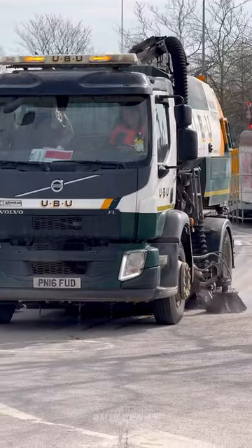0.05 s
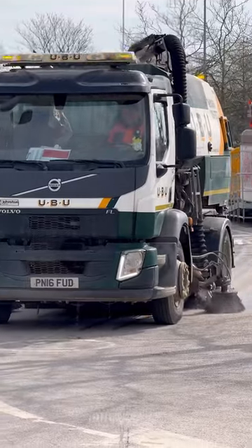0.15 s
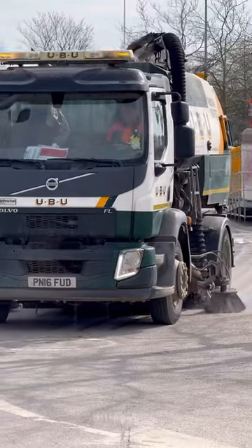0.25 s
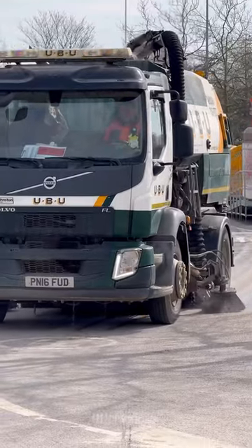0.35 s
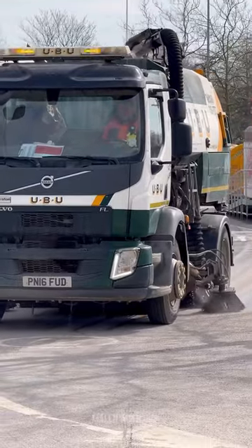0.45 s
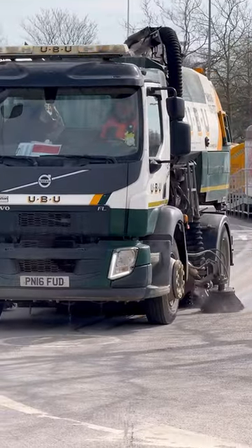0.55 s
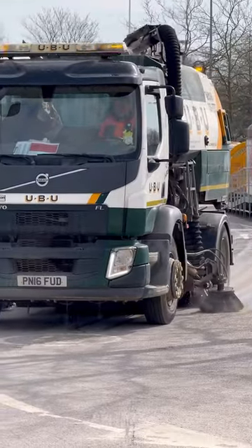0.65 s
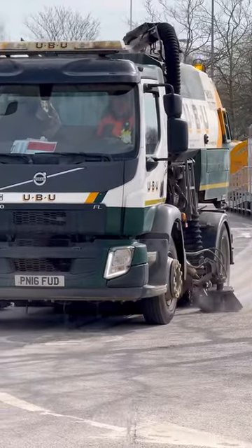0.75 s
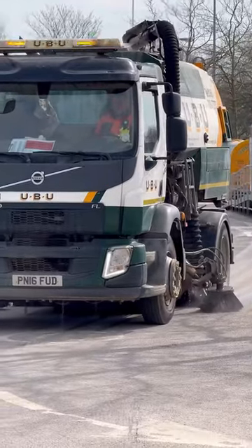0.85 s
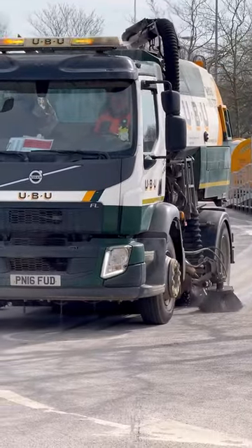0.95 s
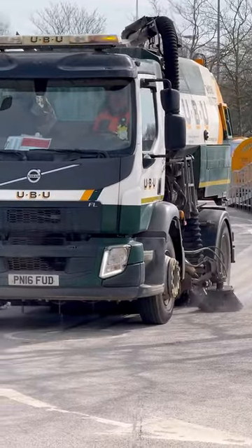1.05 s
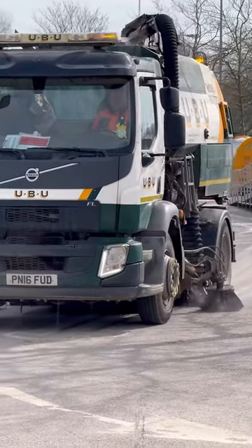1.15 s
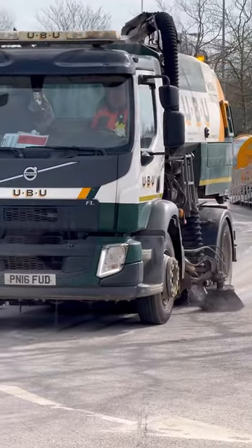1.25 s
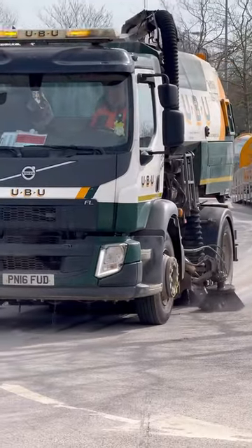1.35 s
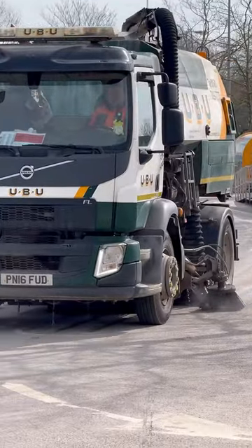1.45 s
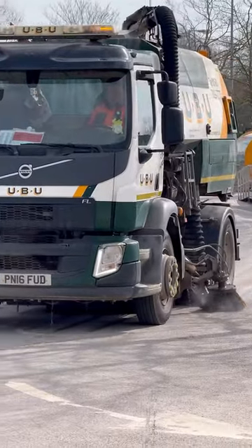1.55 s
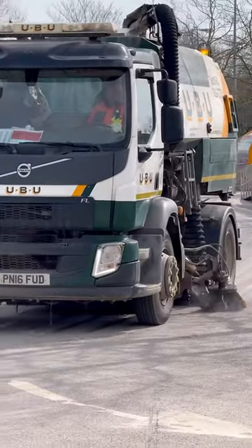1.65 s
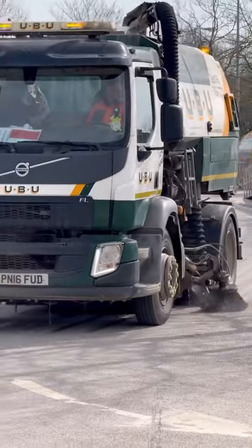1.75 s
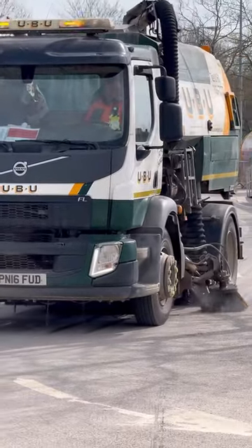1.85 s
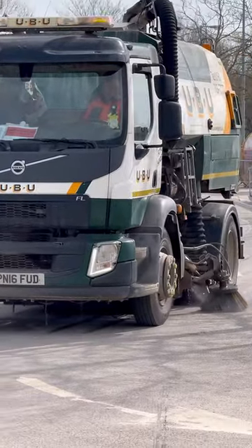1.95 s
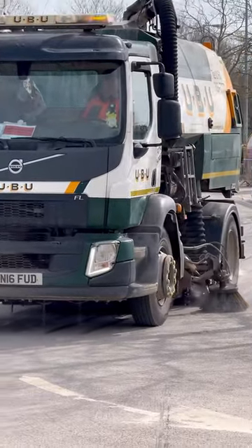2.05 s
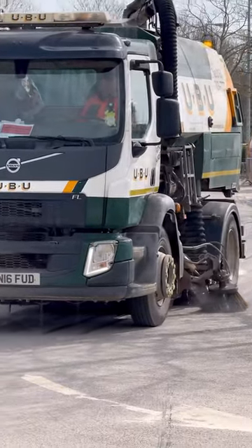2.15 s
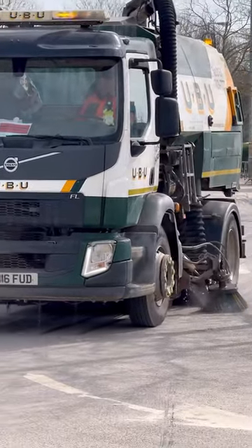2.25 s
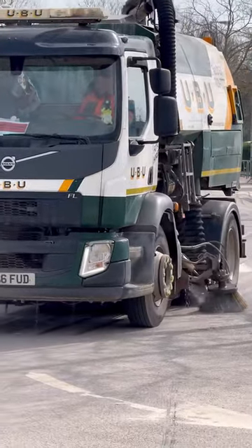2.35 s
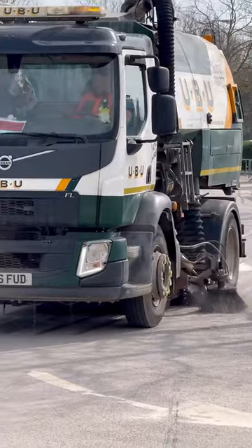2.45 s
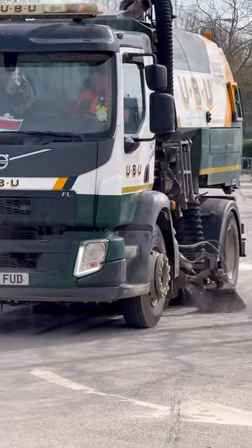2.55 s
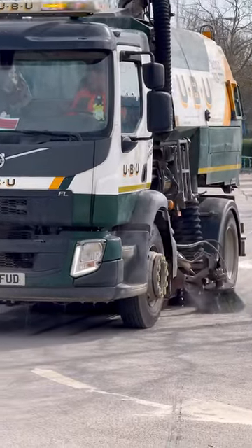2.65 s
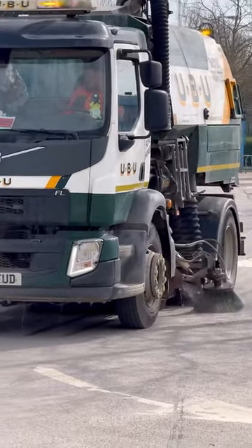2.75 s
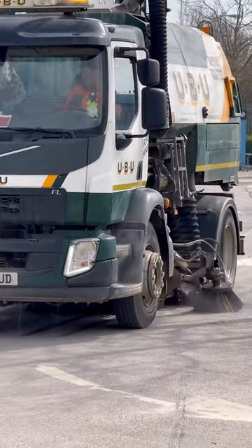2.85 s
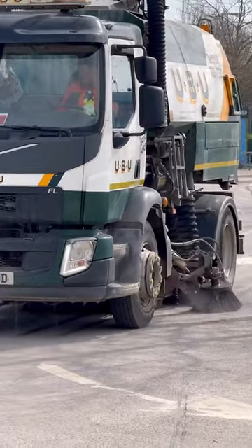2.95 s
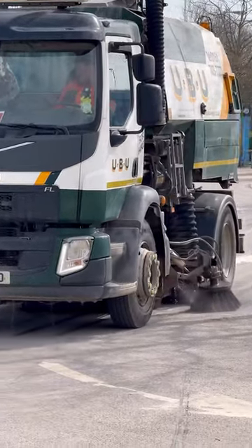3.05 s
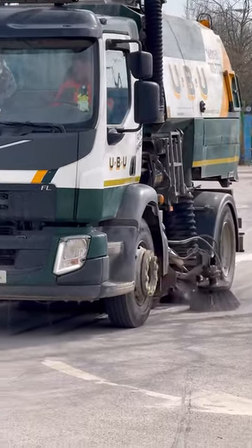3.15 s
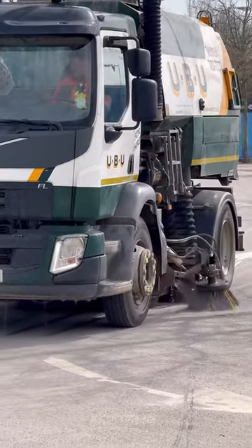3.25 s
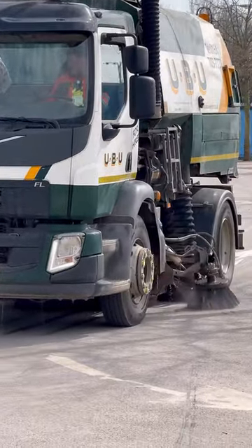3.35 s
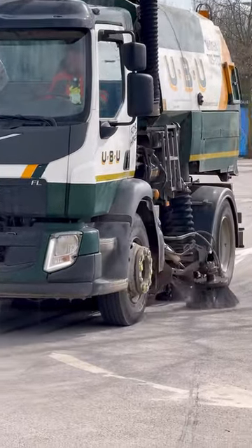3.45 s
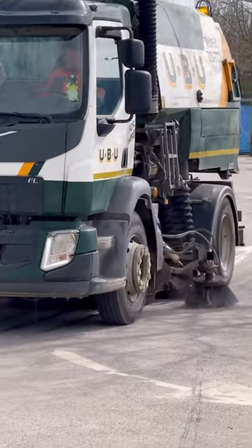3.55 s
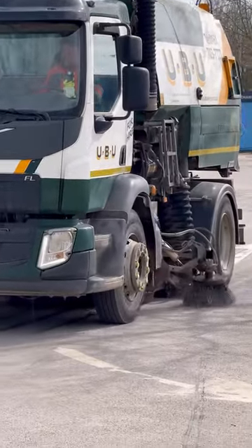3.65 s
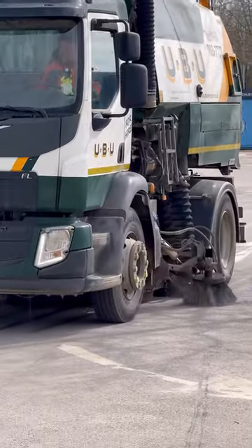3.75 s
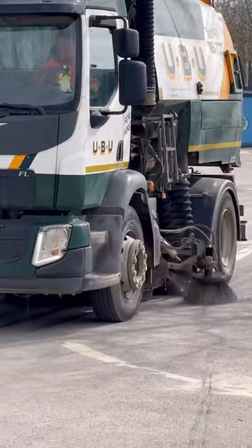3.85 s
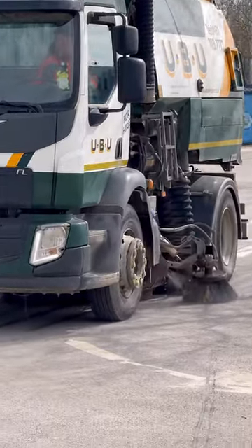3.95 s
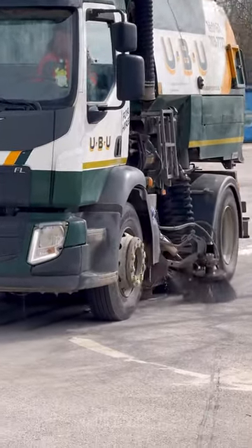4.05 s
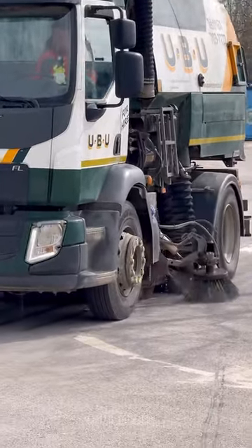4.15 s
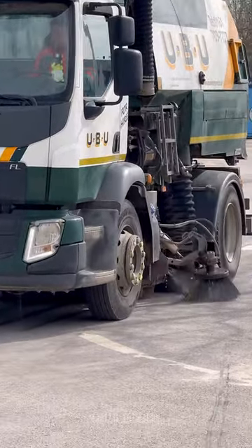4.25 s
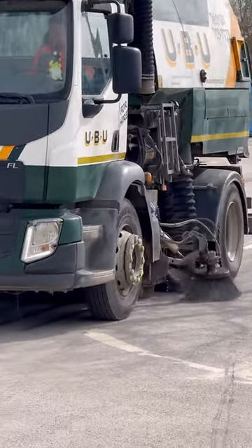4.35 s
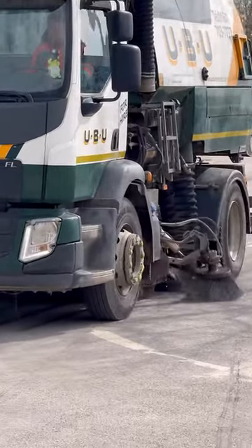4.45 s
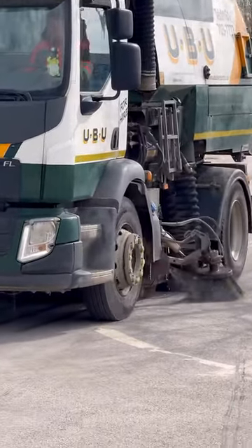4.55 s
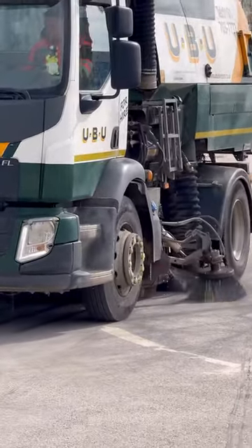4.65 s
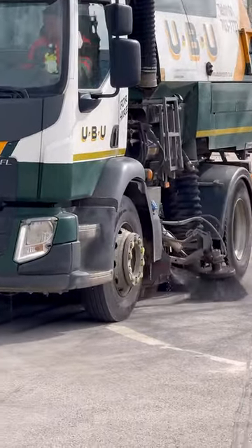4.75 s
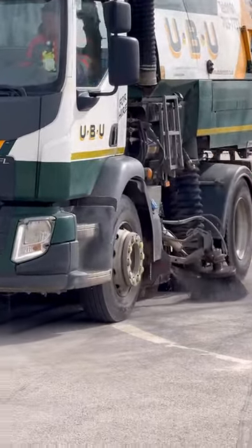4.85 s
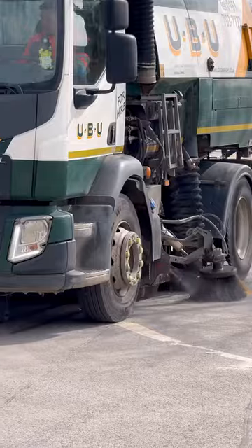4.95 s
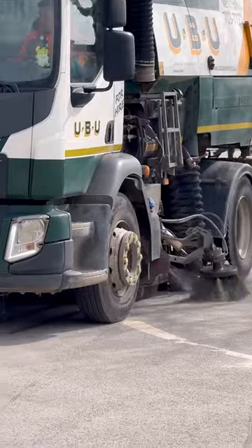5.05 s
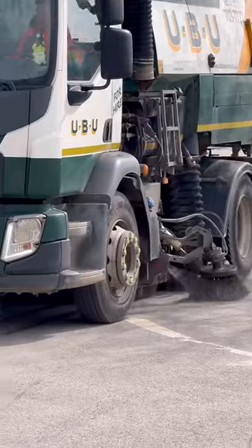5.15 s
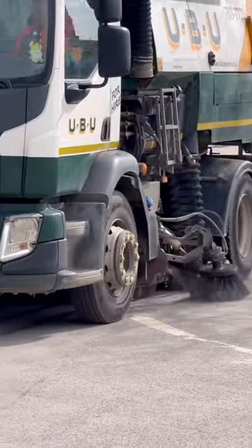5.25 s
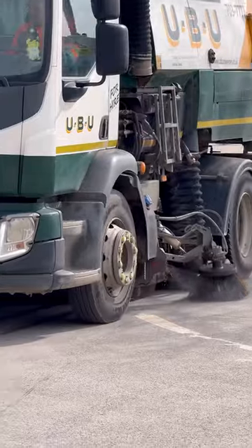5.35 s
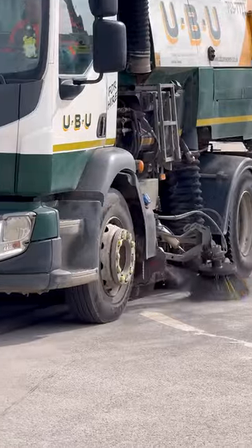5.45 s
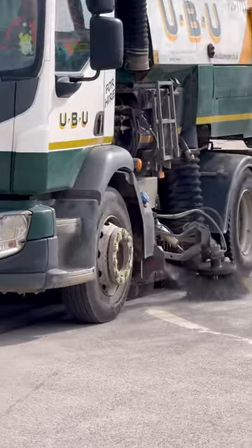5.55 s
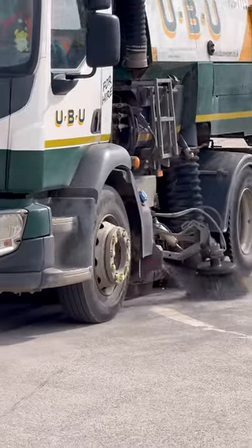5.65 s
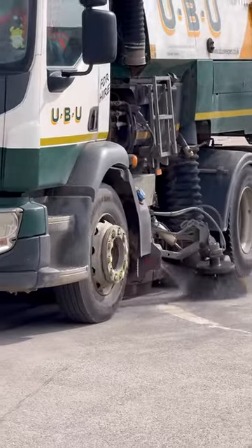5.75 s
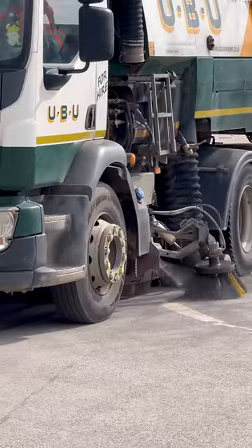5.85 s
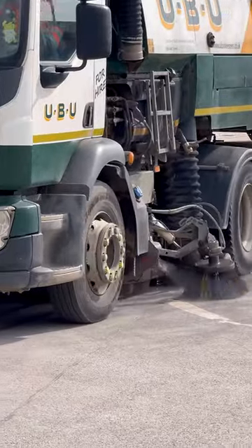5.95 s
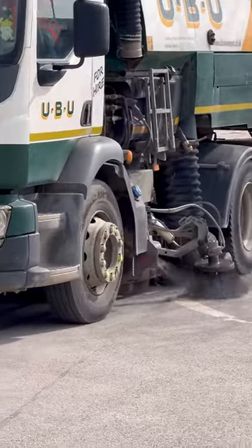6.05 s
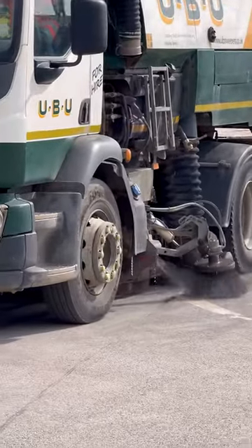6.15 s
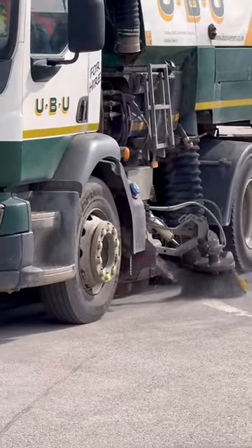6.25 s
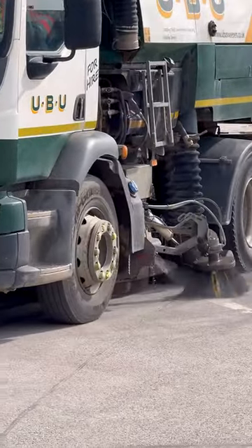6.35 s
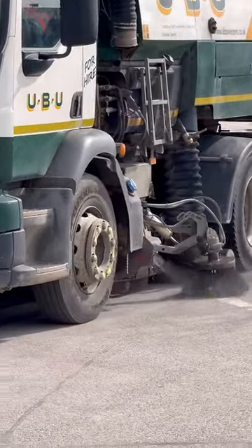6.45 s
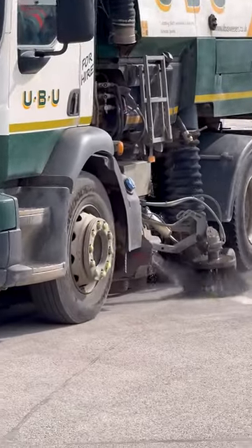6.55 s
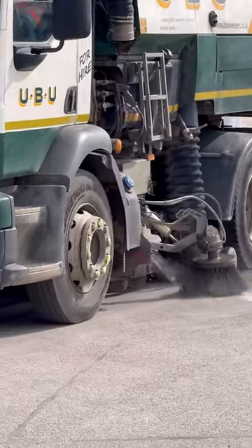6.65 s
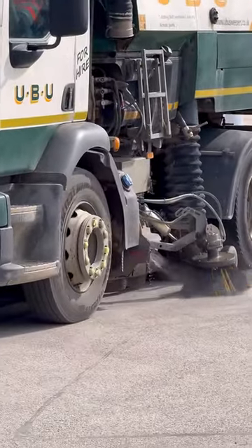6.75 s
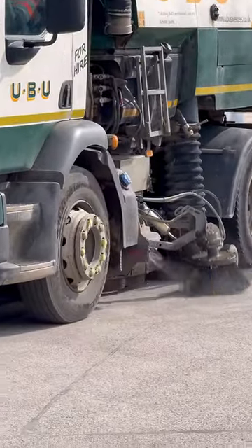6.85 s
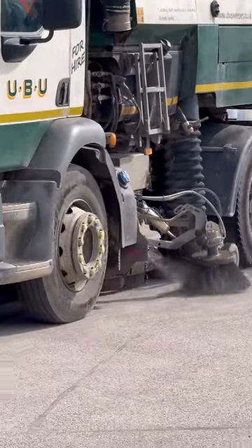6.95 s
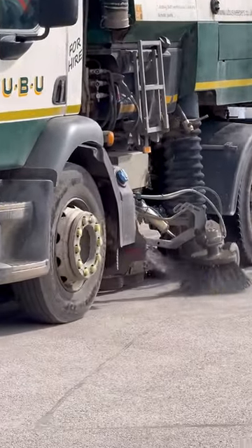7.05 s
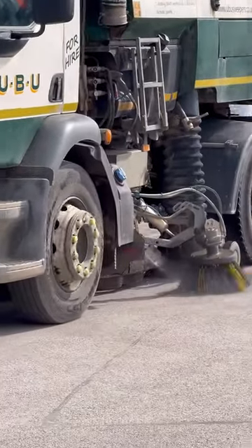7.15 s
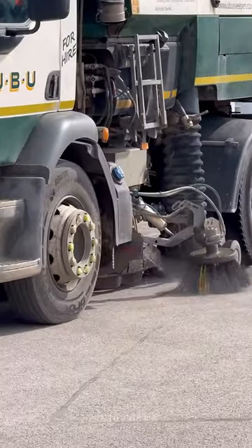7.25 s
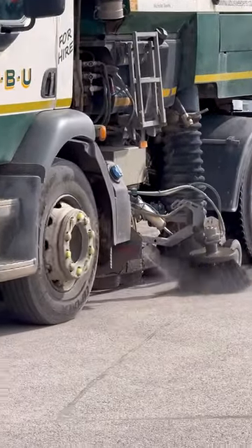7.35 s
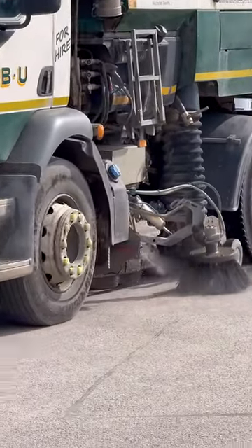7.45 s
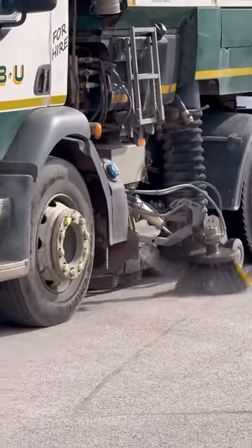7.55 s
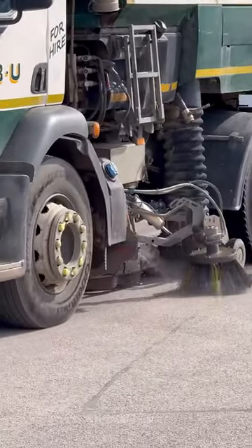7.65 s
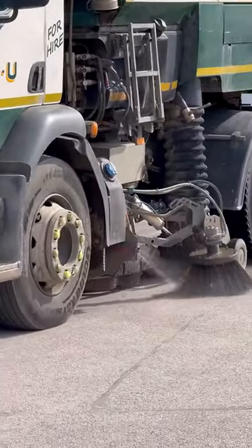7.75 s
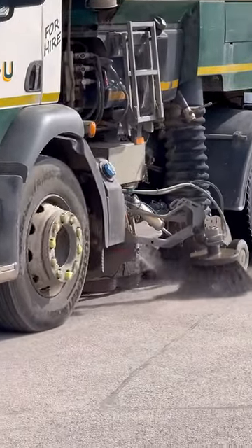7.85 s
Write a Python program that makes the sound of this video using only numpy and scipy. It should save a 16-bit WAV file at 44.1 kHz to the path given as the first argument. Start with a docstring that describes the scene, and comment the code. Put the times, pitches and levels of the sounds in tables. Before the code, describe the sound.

A street sweeper crawls toward the microphone on open tarmac. Two diesel engines throb low, beneath a broad roar of suction air and a steady-pitched fan hum that repeatedly dips and returns. A brush scratches dry and gritty, water jets hiss above it, and soft exhaust booms punctuate the bass. Everything runs from the start and gradually grows louder and closer.

```python
"""A road sweeper creeps nearer on tarmac. From the start two diesels throb: firing harmonics over pulsed noise.
With them sound a fan's blade tone, roaring air, a scratching brush, hissing water jets (all shaped noise)
and a thin gear whine. Exhaust booms follow at once; from about 0.5 s the blade tone fades and returns,
from about 1 s the pump whine comes and goes. Bands of the rush swell and sink on the way.
From about 6.4 s the blade tone's octave swells most."""
import sys
import numpy as np
from scipy import signal
from scipy.fft import rfft, irfft, next_fast_len
from scipy.io import wavfile
from scipy.ndimage import uniform_filter1d, map_coordinates

SR = 44100
rng = np.random.default_rng(int(sys.argv[2]) if len(sys.argv) > 2 else 0)


def generate_wav(sig):
    """Save sig (samples, or channels by samples) to the path in sys.argv[1] as 16-bit PCM at SR."""
    pcm = np.round(np.clip(np.atleast_2d(sig).T, -1, 1) * 32767).astype(np.int16)
    wavfile.write(sys.argv[1], SR, pcm)


N = 347949
TIME_S = np.arange(N) / SR


def amp(db):
    """Gain of a level in dB."""
    return 10 ** (np.asarray(db) / 20)


def unit(x):
    """x scaled to rms 1."""
    return x / np.sqrt(np.mean(x ** 2) + 1e-20)


def along(points, hz):
    """Interpolates (f/Hz, value) points on a log frequency axis."""
    f, v = np.transpose(points)
    return np.interp(np.log(hz + 1), np.log(f + 1), v)


def curves(rows):
    """One value per sample for each column after the time."""
    s, *cols = np.transpose(rows)
    return [np.interp(TIME_S, s, c) for c in cols]


def wobble(rate_hz):
    """Smooth random curve, rate_hz knots a second."""
    knots = rng.standard_normal(int(N * rate_hz / SR) + 4)
    return map_coordinates(knots, [np.arange(N) * rate_hz / SR])


def swell(at_s, width_s, shape=2):
    """Rises from 0 to 1 at a moment and falls back; width_s is the half-width at 1/e."""
    return np.exp(-np.abs((TIME_S - at_s) / width_s) ** shape)


def filtered(x, response):
    """x times a complex response of frequency."""
    m = next_fast_len(N + SR // 2)
    return irfft(rfft(x, m) * response(np.fft.rfftfreq(m, 1 / SR)), m)[..., :N]


def angle_of(hz):
    """Running phase of something that turns at a changing rate."""
    return 2 * np.pi * np.cumsum(hz) / SR


START_M, SPEED_M_PER_S = 12, .55


def approach_db():
    """Inverse-distance gain as the truck nears, 0 dB at the start."""
    return -20 * np.log10(1 - SPEED_M_PER_S * TIME_S / START_M)


def turbulence(patchy_db):
    """Three noises (shared, left only, right only) with drifting patches of random gain."""
    z = signal.stft(rng.standard_normal((3, N)), nperseg=512)[2]
    field = uniform_filter1d(rng.standard_normal(z.shape[1:]), 5, 0)  # smooth over frequency
    field = uniform_filter1d(field, 18, 1)  # smooth over time
    return signal.istft(z * amp(patchy_db * unit(field)), nperseg=512)[1][:, :N]


# Resonances of nozzle and brush plate, on every noise: f/Hz, width/Hz, lift/dB
RESONANCES = [(1000, 70, 0.5), (1200, 120, 1), (1640, 90, 1), (1780, 90, -1.5), (1920, 90, 1.5),
              (2700, 170, 3), (3370, 150, 1.5), (3660, 150, -1.5), (3930, 240, 2.5)]
# Stereo phase of the shared noise: f/Hz, left lead/rad
STEREO_PHASE = [(4800, 0), (6000, -0.6), (7320, -1.5), (10100, -2.5), (11800, -3.5), (13200, -3.5),
                (15300, -4.5)]
# Independent left and right noise: f/Hz, level/dB against the shared noise
SIDE_NOISE = [(100, -58), (200, -26), (400, -16), (650, -11), (900, -20), (1600, -55), (4400, -45),
              (5500, -11), (6500, -10), (9000, -10), (12000, -21), (15000, -9)]
# Balance of the shared noise: f/Hz, left minus right/dB
STEREO_BALANCE = [(150, 0), (350, 0.3), (520, 3), (720, 3), (1000, 0)]


def radiated(noises, spectrum):
    """Colours shared and side noise by spectrum and resonances; stereo, joint rms 1."""
    sides = np.array([[1], [-1]])

    def colour(hz):
        lift_db = sum(db / (1 + (2 * (hz - centre) / width) ** 2) for centre, width, db in RESONANCES)
        return amp(along(spectrum, hz) + lift_db)

    def stereo(hz):
        phase = np.exp(.5j * sides * along(STEREO_PHASE, hz))
        return phase * amp(sides * along(STEREO_BALANCE, hz) / 2)

    noises = filtered(noises, colour)
    shared = filtered(noises[0], stereo)
    independent = filtered(noises[1:], lambda hz: amp(along(SIDE_NOISE, hz)))
    return unit(shared + independent)


def diesel(firing_hz, orders, drift, flutter_db):
    """A governed engine: its firing phase and its unsteady low orders."""
    firing = angle_of(firing_hz * (1 + drift * wobble(2)))
    lines = 0
    for order, db in orders:
        level = amp(db + flutter_db * wobble(4))
        lines = lines + level * np.sin(order * firing + rng.uniform(0, 2 * np.pi))
    return firing, np.sqrt(2) * lines


# Drive engine: multiple of firing rate, relative level/dB
DRIVE_ORDERS = [(1, -10), (2, -4), (2.75, -16), (3, -16), (3.75, -10), (4, -15.5), (4.25, -17), (5.5, -18),
                (7.5, -17.5)]
# Fan engine: multiple of firing rate, relative level/dB
FAN_ENGINE_ORDERS = [(1, -10), (1.5, -17), (2, -17), (3, -21)]
# Drive engine hum: t/s, level/dB against the throb
DRIVE_LEVEL = [(0, -1), (2.2, -2), (2.7, -5), (3.5, -3), (4.1, 0), (5.6, -2.5), (6.1, -4.5), (6.7, -2),
               (7.89, -3.5)]
# Exhaust noise: f/Hz, relative density/dB
EXHAUST_SPECTRUM = [(20, -42), (31, -28), (39, -12), (48, -3), (70, 1), (110, -4), (135, -11), (200, -28),
                    (500, -70)]
# Engine block knock: f/Hz, relative density/dB
BLOCK_SPECTRUM = [(40, -40), (100, -10), (135, 0), (155, .5), (172, -3), (195, 2), (215, -.5), (245, -3),
                  (285, -4), (310, -8), (450, -24), (900, -60)]
# Brief sags of exhaust and fan engine: t/s, depth/dB
SAGS = [(.13, 3), (1.78, 3), (5.22, 4), (5.53, 5), (6.2, 6), (6.82, 3)]
SAG_S = .09
THROB_DB, BLOCK_DB = -26.6, -29.4  # at the start
EXHAUST_DB = -2.8  # against the throb
EXHAUST_GROWS, BLOCK_GROWS = .35, .45  # share of approach gain


def engines():
    """Two diesels hum; exhaust noise and block knock swell at each firing of the drive engine."""
    near_db = approach_db()
    surge_db = .7 * wobble(10) - sum(db * swell(s, SAG_S) for s, db in SAGS)
    block_db = BLOCK_DB + BLOCK_GROWS * near_db + .7 * wobble(7)
    firing, drive = diesel(52.1, DRIVE_ORDERS, drift=.004, flutter_db=2.2)
    _, fan_engine = diesel(71.8, FAN_ENGINE_ORDERS, drift=.012, flutter_db=2.2)
    drive_db, = curves(DRIVE_LEVEL)
    beat = 1 + .3 * np.cos(firing)
    exhaust = radiated(turbulence(patchy_db=.6) * beat, EXHAUST_SPECTRUM)
    exhaust = amp(EXHAUST_DB + EXHAUST_GROWS * near_db) * exhaust
    block = amp(block_db) * radiated(turbulence(patchy_db=.6) * beat, BLOCK_SPECTRUM)
    surging = amp(surge_db) * (exhaust + amp(-3) * fan_engine)
    return amp(THROB_DB) * (surging + amp(drive_db) * drive) + block


# Fades of the blade tone: t/s, depth/dB, half-width/s
TONE_FADES = [(.57, 3.1, .1), (1.12, 8.6, .36), (1.2, 15, .06), (1.67, 10.5, .1), (1.86, 9, .14),
              (2.52, 7.2, .16), (3.105, 20, .068), (3.55, 4.7, .2), (3.86, 6, .06), (4.02, 7.5, .09),
              (4.4, 7.2, .16), (4.74, 5, .11), (4.98, 6.5, .12), (5.56, 11.5, .11), (6.35, 7.5, .075),
              (6.62, 5.4, .19), (7.09, 16, .105), (7.45, 4.2, .15), (7.83, 13, .09)]
# Swells of the octave: t/s, lift/dB
OCTAVE_SWELLS = [(.3, 7), (.6, 6), (.92, 7), (1.37, 8), (2.25, 6), (3.08, 8), (3.28, 8), (3.51, 8),
                 (3.74, 7), (4.12, 6), (4.33, 6), (4.55, 7), (4.82, 8), (5.35, 8), (6.0, 6), (6.44, 10),
                 (6.7, 11), (7.1, 11), (7.32, 15), (7.46, 11), (7.59, 10), (7.72, 10), (7.83, 12)]
TONE_DB = -21.8  # at the start
TONE_GROWS = 2  # times approach gain: the fan's outlet turns into view
FADE_SHAPE = 1.4  # 1 = pointed notch, 2 = round dip
SLIP_RAD_PER_DB, SLIP_SHARE = .08, .35  # phase slip per fade depth; its share of the fade half-width
OCTAVE_DB, OCTAVE_SWELL_S = -45, .085  # level between swells; half-width


def fan():
    """Blades pass the casing's tongue: tone and octave; where paths cancel, the tone fades and slips."""
    fade_db = sum(db * swell(s, width, FADE_SHAPE) for s, db, width in TONE_FADES)
    tone_db = TONE_DB + TONE_GROWS * approach_db() - fade_db
    slip = SLIP_RAD_PER_DB * sum(db * np.tanh((TIME_S - s) / (SLIP_SHARE * width)) / 2
                                 for s, db, width in TONE_FADES)
    octave_db = OCTAVE_DB + sum(db * swell(s, OCTAVE_SWELL_S) for s, db in OCTAVE_SWELLS)
    blade = angle_of(351.3 + .15 * wobble(2)) + .04 * wobble(30)
    tone = amp(tone_db + .9 * wobble(24)) * np.sin(blade + slip)
    octave = amp(octave_db + wobble(10)) * np.sin(angle_of(701.3 + 1.8 * wobble(8)))
    return np.sqrt(2) * (tone * amp([[.1], [-.1]]) + octave * amp([[1], [-1]]))  # left, right dB


# Air roar: f/Hz, relative density/dB
ROAR_SPECTRUM = [(30, -60), (100, -33), (250, -6), (320, 1), (365, 5), (420, 1), (500, 1), (600, -0.7),
                 (900, -3.5), (1150, -3), (1400, -5), (2050, -7.7), (2400, -13.5), (3500, -22.5),
                 (7000, -53)]
ROAR_DB = -28.2  # at the start, without the beam lift
ROAR_BEAM_DB, ROAR_FACING_S, ROAR_BEAM_S = 1.1, 4.6, 2  # nozzle faces listener: lift, moment, half-width


def suction():
    """Air roars through nozzle and ducts, louder as the truck nears."""
    roar_db = ROAR_DB + approach_db() + ROAR_BEAM_DB * swell(ROAR_FACING_S, ROAR_BEAM_S)
    return amp(roar_db + .25 * wobble(20)) * radiated(turbulence(patchy_db=.8), ROAR_SPECTRUM)


# Brush and water, before trims: t/s, brush level/dB, spray level/dB
SWEEP_LEVELS = [(0.0, -34.7, -42.3), (.7, -35, -43), (1.16, -37, -46.2), (1.8, -34.3, -41),
                (2.11, -34.4, -41.6), (2.35, -33.2, -40.6), (3.0, -33.1, -39.9), (3.93, -31.4, -39),
                (4.45, -33.5, -42.3), (4.85, -32, -39), (5.1, -32.2, -40), (5.32, -32.4, -37.6),
                (5.6, -32.4, -41), (6.04, -31.4, -38.5), (6.66, -32.2, -42), (6.81, -33, -41.4),
                (7.69, -30, -37), (7.89, -31, -38.5)]
# Brush scratch: f/Hz, relative density/dB
BRUSH_SPECTRUM = [(100, -60), (900, -27), (2000, -7), (2600, -0.5), (3300, 0), (4300, -1.3), (4700, .5),
                  (5200, 0), (6200, -2.5), (7200, -10.5), (9000, -19), (16000, -38)]


def brush():
    """Steel bristles flick over tarmac: thousands of tiny scratches on a rush of grit."""
    brush_db, _ = curves(SWEEP_LEVELS)
    grit = unit(turbulence(patchy_db=1.3))
    flicks = (rng.random(grit.shape) < 3000 / SR) * rng.standard_normal(grit.shape)  # 3000 per s
    scratch = radiated(grit + .35 * unit(flicks), BRUSH_SPECTRUM)
    return amp(brush_db + .2 + .3 * wobble(35)) * scratch


# Water hiss: f/Hz, relative density/dB
SPRAY_SPECTRUM = [(500, -70), (3500, -35), (6000, -10), (7400, -7.5), (8300, -2), (9500, -1.5), (10700, 0),
                  (12500, -5), (14000, -12), (17000, -30)]
# Finest droplets: f/Hz, relative density/dB
MIST_SPECTRUM = [(3000, -70), (9000, -22), (11500, -8), (12800, -5), (13800, 0), (16000, 0), (17000, -60)]
MIST_DB, MIST_GROWS = 2.6, 1.2  # over the spray table's mean; swing relative to the table's
MIST_NEARS = .4  # share of approach gain by which mist overtakes hiss


def spray():
    """Water jets lay the dust: a hiss and a finer mist sputter together."""
    _, spray_db = curves(SWEEP_LEVELS)
    near_db = approach_db()
    near_db = MIST_NEARS * (near_db - near_db.mean())
    mean_db = spray_db.mean()
    mist_db = MIST_DB + near_db / 2 + mean_db + MIST_GROWS * (spray_db - mean_db)
    hiss_db = spray_db + 6.1 - near_db / 2
    hiss = amp(hiss_db) * radiated(turbulence(patchy_db=1.3), SPRAY_SPECTRUM)
    mist = amp(mist_db) * radiated(turbulence(patchy_db=1.3), MIST_SPECTRUM)
    return amp(.6 * wobble(45) + .45 * wobble(20)) * (hiss + mist)


# Hydraulic pump tones: f/Hz, level/dB against the pump whine
PUMP_TONES = [(328.6, -1), (657.3, 0), (1668, -13)]
# Swells of the pump whine: t/s, lift/dB
PUMP_SWELLS = [(.97, 12), (1.84, 13), (2.66, 15), (2.95, 7), (3.53, 13), (4.08, 8), (4.31, 13), (4.66, 11),
               (5.25, 13), (5.54, 13), (6.25, 9), (6.95, 10)]
PUMP_DB, PUMP_SWELL_S = -50.3, .17  # level between swells; half-width
GEAR_HZ, GEAR_DB = 2021, -53  # level at the start


def pumps():
    """Hydraulic pumps whine, coming and going, beside a thin gear tone; all slightly unsteady."""
    pump_db = PUMP_DB + sum(db * swell(s, PUMP_SWELL_S) for s, db in PUMP_SWELLS)
    whine = 0
    for hz, db in PUMP_TONES:
        level = amp(db + 1.5 * wobble(6))
        whine = whine + level * np.sin(angle_of(hz * (1 + .001 * wobble(5))))
    gear_db = GEAR_DB + approach_db() + 2.5 * wobble(5)
    gear = amp(gear_db) * np.sin(angle_of(GEAR_HZ + 2 * wobble(5)))
    return np.sqrt(2) * (amp(pump_db) * whine + gear)


# Exhaust booms: t/s, f/Hz, level/dB
THUDS = [(.07, 72, -29), (.53, 104, -25), (.62, 78, -27), (1.02, 71, -23), (1.5, 110, -26), (2.42, 75, -26),
         (3.02, 54, -28), (3.32, 68, -24.5), (4.22, 70, -22), (4.69, 102, -22.5), (5.05, 72, -22),
         (5.45, 106, -24.5), (5.66, 75, -20), (6.57, 72, -24), (7.33, 72, -24.5)]
THUD_S = .038  # half-width


def thuds():
    """Now and then the exhaust booms: a low sine for a few cycles."""
    booms = 0
    for s, hz, db in THUDS:
        phase = 2 * np.pi * hz * (TIME_S - s) + rng.uniform(0, 2 * np.pi)
        booms = booms + amp(db) * swell(s, THUD_S) * np.sin(phase)
    return np.sqrt(2) * booms


# Band shifts of the rush: t/s, half-width/s, f/Hz, width/Hz, lift/dB, glide/(Hz/s)
COLOUR_SHIFTS = [(1.9, 1.6, 1230, 130, 1.8, 0), (3.05, .55, 1900, 130, -3, 0), (3.6, .9, 2740, 300, 2.5, 0),
                 (3.5, .4, 1280, 200, 1.5, 0), (4.2, 1.2, 1400, 100, -2.5, -80), (4.7, .55, 510, 130, 2, 0),
                 (5.25, .5, 1980, 220, 3, 80), (7.2, 1, 810, 90, 3, 0), (7.5, .7, 1580, 250, 1.8, 0),
                 (7.5, .9, 2600, 350, -1.8, -120)]


def shifting(x):
    """Paths off road and truck body change as it moves: one band stands out, another sinks."""
    hz, t, z = signal.stft(x, SR, nperseg=2048)
    lift_db = 0
    for s, half_s, centre, width, db, glide in COLOUR_SHIFTS:
        off_hz = hz[:, None] - centre - glide * (t - s)
        lift_db = lift_db + db * np.exp(-((t - s) / half_s) ** 2 - (2 * off_hz / width) ** 2)
    return signal.istft(z * amp(lift_db), nperseg=2048)[1][:, :N]


def scene():
    """Sums all sources; band shifts act on roar and brush only."""
    return engines() + fan() + shifting(suction() + brush()) + spray() + pumps() + thuds()


TOP_HZ = 15780


def record(dry):
    """Removes everything from the band limit up."""
    return filtered(dry, lambda hz: hz < TOP_HZ)


dry = scene()
out = record(dry)
generate_wav(out)
```